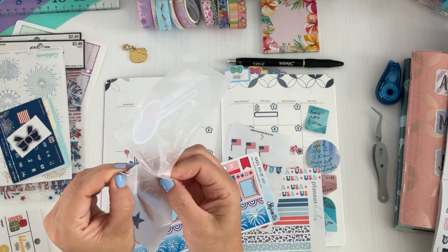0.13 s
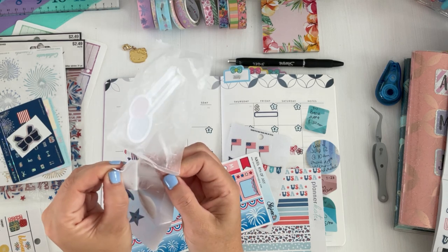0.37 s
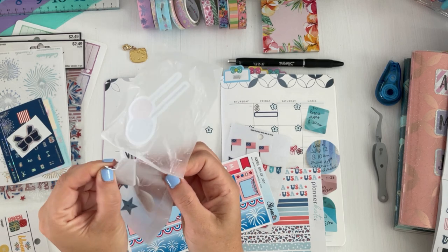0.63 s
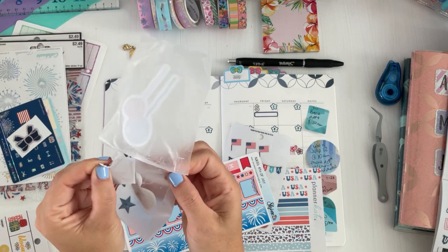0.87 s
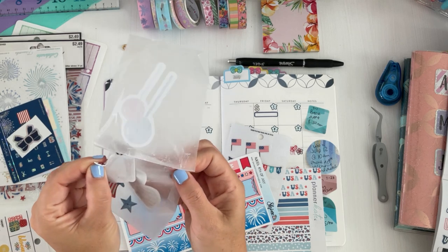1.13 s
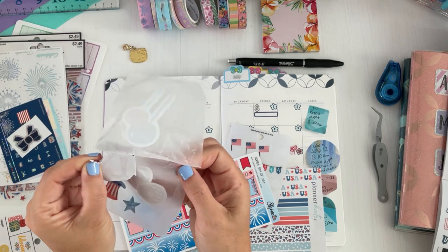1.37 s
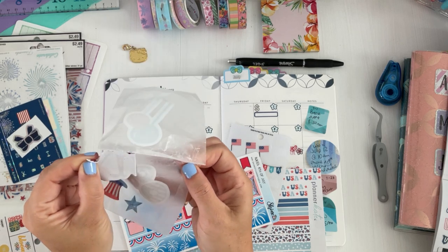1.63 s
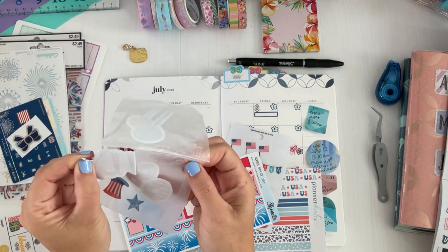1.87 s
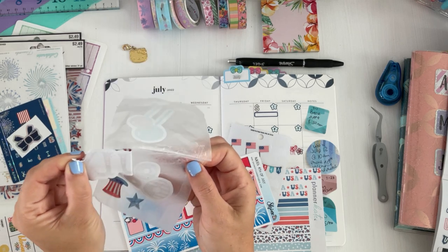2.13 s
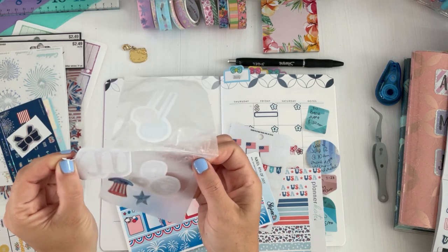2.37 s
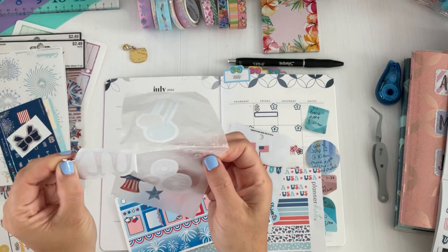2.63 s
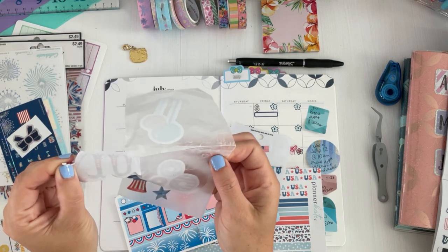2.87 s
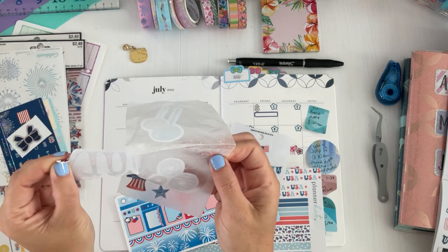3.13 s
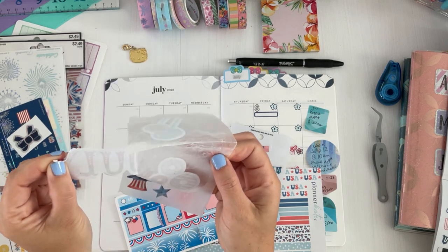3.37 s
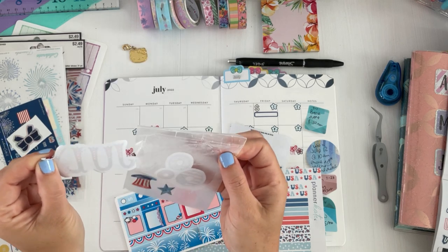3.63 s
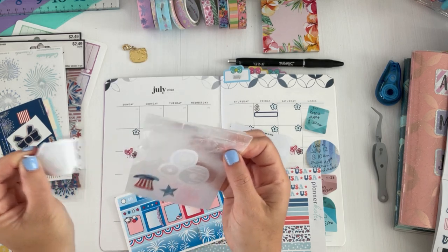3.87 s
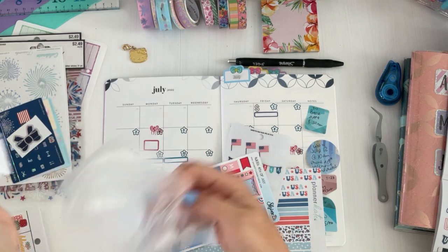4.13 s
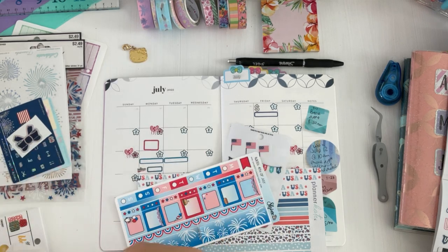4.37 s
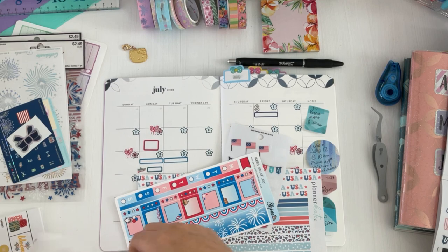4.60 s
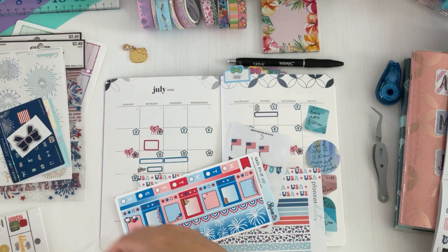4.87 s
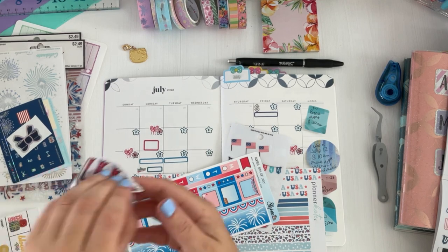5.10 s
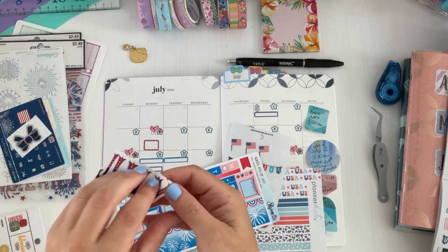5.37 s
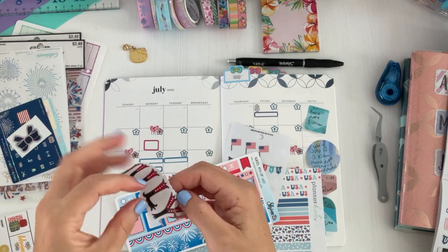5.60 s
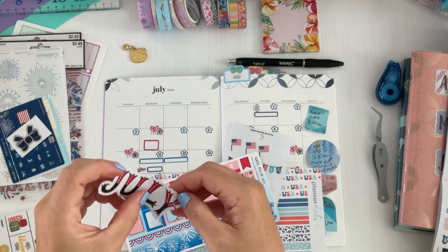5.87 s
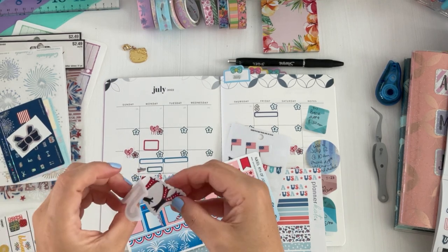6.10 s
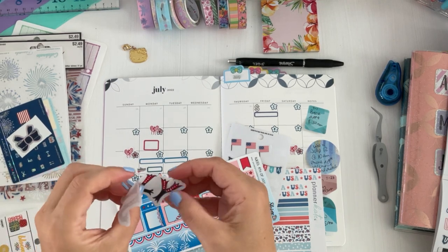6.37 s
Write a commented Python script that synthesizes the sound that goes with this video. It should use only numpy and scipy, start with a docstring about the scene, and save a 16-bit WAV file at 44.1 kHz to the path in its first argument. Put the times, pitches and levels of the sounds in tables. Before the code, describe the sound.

Close crackling and rustling of a thin plastic wrapper being peeled, busiest past the middle, in a quiet room with a faint low hum.

```python
"""Hands peel and crumple thin plastic film over a desk, close under a microphone in a quiet room.
From the start creases snap one at a time, each a ragged noise burst ringing its own facet, over a fine
rustle of film sliding in the fingers, made of ticks and hiss. A bright cluster bursts at 3.5 s, the snaps
crowd together around 4.3 s, then thin out and get mostly fainter, many of the last ones high.
Throughout, desk echoes and a wall tail answer each snap, and a faint hum wavers in the room tone."""
import sys
import numpy as np
from scipy import signal
from scipy.fft import rfft, irfft
from scipy.io import wavfile
from scipy.ndimage import uniform_filter1d

SR = 44100
rng = np.random.default_rng(int(sys.argv[2]) if len(sys.argv) > 2 else 0)


def waveform_to_disk(signal):
    """Save audio, clipped to [-1, 1], as 16-bit WAV at the path in sys.argv[1]."""
    frames = np.transpose(np.atleast_2d(signal))
    scaled = np.clip(frames, -1, 1) * 32767
    samples = np.round(scaled).astype(np.int16)
    wavfile.write(sys.argv[1], SR, samples)


def gain_from_db(level_db):
    """Convert decibel levels to linear amplitude factors (20 dB per decade)."""
    decades = np.asarray(level_db, float) / 20
    return 10 ** decades


N = 286120  # samples in the scene


def evened(x):
    """Scales each row to rms 1."""
    return x / np.sqrt(np.mean(x ** 2, axis=-1, keepdims=True) + 1e-20)


def read(points, hz):
    """Reads a spectrum table on a log-frequency axis."""
    f, value = np.transpose(points)
    return np.interp(np.log(hz + 1), np.log(f + 1), value)


def colour(x, points):
    """Gives x the spectrum of a table."""
    gain_db = read(points, np.fft.rfftfreq(len(x), 1 / SR))
    return irfft(rfft(x) * gain_from_db(gain_db), len(x))


def band(x, lo_hz, hi_hz):
    """Causal band-pass along the last axis."""
    return signal.sosfilt(signal.butter(3, [lo_hz, hi_hz], "bandpass", fs=SR, output="sos"), x)


def resonate(x, hz, width_hz):
    """One resonance with a peak gain near 1."""
    r = np.exp(-np.pi * width_hz / SR)
    return signal.lfilter([1 - r, 0, r - 1], [1, -2 * r * np.cos(2 * np.pi * hz / SR), r * r], x)


def three_bands(noises, bass_hz, body_hz):
    """Takes low flap, body and fizz from three noises, each at rms 1."""
    edges = [bass_hz, body_hz, 8000, 17000]
    return [evened(band(x, lo, hi)) for x, lo, hi in zip(noises, edges, edges[1:])]


def shifting(x, patchy_db, broad_db):
    """Narrow and broad frequency ranges swell and fade at random, alike in every row."""
    z = signal.stft(x, nperseg=512, noverlap=384)[2]
    chance = rng.standard_normal(z.shape[:0:-1]).T  # (frequency, time)
    patches = uniform_filter1d(uniform_filter1d(chance, size=6, axis=0), size=60, axis=1)
    broad = uniform_filter1d(uniform_filter1d(chance[::-1], size=28, axis=0), size=30, axis=1)
    gain_db = patchy_db * patches / patches.std() + broad_db * broad / broad.std()
    return signal.istft(z * gain_from_db(gain_db), nperseg=512, noverlap=384)[1][:, :N]


def slow(top_hz):
    """Slow chance at rms 1: sines of random phase up to a top rate."""
    t = np.arange(0, N + 256, 256) / SR
    rates = np.geomspace(1.2, top_hz, num=24)
    wave = sum(np.sin(2 * np.pi * (f * t + rng.random())) / np.sqrt(f) for f in rates)
    return evened(np.interp(np.arange(N) / SR, t, wave))


# colour of the still air in the room: (f/Hz, relative level per Hz/dB)
AIR_COLOUR = [(18, -44), (33, -35), (90, -4), (165, -0.5), (435, -8), (566, -15), (716, -18), (931, -20),
              (1010, -23.5), (1150, -24), (1490, -27), (1840, -12), (2300, -20.5), (3540, -30),
              (12200, -37.5), (15800, -33.5)]
# fuzzy low tones in the room: (f/Hz, width/Hz, rms level/dB)
LOW_TONES = [(254, 22, -75), (74, 20, -75.5), (92, 9.8, -82), (352.2, 8.8, -80.5)]


def room_tone():
    """Still air as coloured noise, low tones as resonated noise, and a hum whose pitch and level waver."""
    air = shifting(rng.standard_normal((1, N)), patchy_db=3.0, broad_db=0.16)[0]
    air = gain_from_db(-64.5) * evened(colour(air, AIR_COLOUR))
    noise = rng.standard_normal((len(LOW_TONES), N))
    fuzz = np.zeros(N)
    for n, (hz, width_hz, db) in zip(noise, LOW_TONES):
        fuzz += gain_from_db(db) * evened(resonate(resonate(n, hz, width_hz), hz, width_hz))
    hum_hz = 130.5 + 1.7 * slow(12)
    hum_db = -65.5 + 1.9 * slow(25)  # rms level
    hum = np.sqrt(2) * gain_from_db(hum_db) * np.sin(2 * np.pi * np.cumsum(hum_hz) / SR)
    return air + fuzz + hum


# how long the walls of the room ring on: (f/Hz, t60/s)
WALL_DECAY = [(400, 0.82), (1500, 0.28), (4000, 0.21), (9000, 0.068), (16000, 0.23)]


def walls(x):
    """Sparse taps of random sign, one in every 20 samples, each band dying at its own speed."""
    taps = np.zeros(SR // 2)
    at = np.arange(400, SR // 2 - 20, 20)  # the tail starts about 9 ms late
    taps[at + rng.integers(0, 20, len(at))] = rng.choice([-1., 1.], len(at))
    hz, t, z = signal.stft(taps, SR, nperseg=256)
    t60 = np.clip(read(WALL_DECAY, hz), .03, 2)[:, None]
    tail = signal.istft(z * gain_from_db(-60 * t / t60), SR, nperseg=256)[1]
    return signal.oaconvolve(x, tail / np.linalg.norm(tail))[:N]


# single echoes from the desk and near things, after the direct sound: (t/s, level/dB)
DESK_ECHOES = [(.0016, -28), (.0034, -18), (0.0142, -51), (0.018, -44), (.021, -43.5)]


def desk(x):
    """Direct sound with single delayed echoes from the desk and near things."""
    taps = np.zeros(2048)
    taps[0] = 1
    for s, db in DESK_ECHOES:
        taps[round(s * SR)] = gain_from_db(db)
    return signal.oaconvolve(x, taps)[:N]


# changing base level and brightness of the rustle: (t/s, level/dB, brightness/dB)
BASE_RUSTLE = [(0.0, -57, -2), (0.48, -57.5, 1), (0.72, -63.5, -1), (1.2, -60.5, 4.5), (1.42, -70.5, 3),
               (1.58, -61.5, 0), (1.74, -55.5, -2.5), (1.87, -68, -2), (1.99, -66.5, 1), (2.55, -60, -3.5),
               (2.9, -63.5, -1), (3.4, -66, -1.5), (3.66, -80, 4), (4.2, -61.5, -9.5), (4.6, -73, 21),
               (4.84, -62, 1), (4.92, -83, -16), (5.04, -92.5, -6), (5.3, -80.5, 0.5), (5.6, -94, -7.5),
               (5.7, -72.5, 1), (5.9, -65, 11), (6.04, -85, -12), (6.38, -76.5, -25), (6.49, -58.5, -1)]
# swells of the film's rustle, from tight bursts to long slides; rise and fall times under 1 ms act as 1 ms:
# (t of the top/s, level/dB, t to rise 20 dB/s, t to fall 20 dB/s, brightness/dB)
RUSTLE_SWELLS = [(.13, -58.5, -1.5, 0.8, 5), (.529, -56, .05, 0.08, -11.5), (1.055, -60.5, -0.2, 0.5, -5),
                 (1.265, -52.5, .03, 0.1, -6), (2.138, -51, 0.03, 0.4, 2), (2.389, -51, 0.8, .18, 0),
                 (3.25, -61, 0.3, .2, 0), (3.503, -40, .01, .02, 0), (3.51, -49, 0.0958, .16, 0),
                 (3.82, -55, .12, .07, 0), (3.835, -42, .008, 0.0243, -2), (3.975, -44, 0.02, 0.0252, -11),
                 (3.985, -60, -0.03, 0, -10), (4.063, -49.5, 0.01, 0.04, -6),
                 (4.18, -57.5, -0.02, 0.36, -5.5), (4.252, -36, 0.02, .012, -3), (4.293, -51, .1, .2, -12),
                 (4.475, -41, .007, .011, -1), (4.48, -52.5, .007, .15, -10),
                 (4.595, -50.5, 0.2, 0.2649, 2), (5.061, -49, .002, 0, 2), (5.085, -51.5, .02, .1, 1),
                 (5.236, -51, .05, .04, 2), (5.386, -61, 0.14, 0.1, 0), (5.458, -50.5, .115, 0.01, 4),
                 (5.492, -53, 0.04, -0.03, 4), (5.532, -58, .07, 0.04, 3), (5.644, -58, 0.01, 0.1, 3.5),
                 (5.727, -65.5, 0.06, .15, 9), (5.797, -58.5, .17, 0.21, 3), (5.914, -45, .022, .008, 3.5),
                 (5.929, -55, -0.02, .05, -1), (6.062, -73, .03, .05, 7), (6.172, -63.5, 0.08, 0.16, 0.5),
                 (6.237, -57, 0.04, .06, 6), (6.33, -72, .08, .12, 8.5), (6.45, -62, .09, .15, 7.5)]


def rustle_gains():
    """Gains of flap, body and fizz: the changing base and each swell add their power."""
    fizz_db, flap_db = 0, -3.5  # relative to the body
    dull_flap = 0.6  # bright rustle fizzes more and flaps less: dB of flap lost per dB of brightness
    flap_time_s, quick_loss_db = .045, 3.5  # quicker swells lose flap for each halving of their length
    t = np.arange(0, N + 64, 64) / SR
    s, db, bright_db = np.transpose(BASE_RUSTLE)
    parts = [(np.interp(t, s, db), np.interp(t, s, bright_db), 0)]
    for top, db, rise, fall, bright_db in RUSTLE_SWELLS:
        rise, fall = max(rise, .001), max(fall, .001)
        level_db = db - 20 * np.maximum((top - t) / rise, (t - top) / fall)
        lost_db = quick_loss_db * max(np.log2(flap_time_s / (rise + fall)), 0)
        parts.append((level_db, bright_db, lost_db))
    power = 0
    for db, bright_db, lost_db in parts:
        flap = db + flap_db - dull_flap * bright_db - lost_db
        power = power + gain_from_db([flap, db, db + fizz_db + bright_db]) ** 2
    return np.array([np.interp(np.arange(N) / SR, t, np.sqrt(p)) for p in power])


# colour of film heard over the desk: (f/Hz, relative level per Hz/dB)
FILM_COLOUR = [(180, -40), (300, -5.5), (360, -1.5), (676, 0), (1250, -10), (1430, -3.5), (1770, 1),
               (2090, -1), (3670, -1), (4190, 2), (5030, 6), (7130, -0.5), (8140, 0), (12100, -5),
               (15800, -8)]


def rustle(gains):
    """Tiny creases tick over a sliding hiss of shifting colour; the gains set the level of each range."""
    ticks_per_s, spread_db, smooth_hiss, grain_s = 900, 3, 2.3, 0.0025
    ticks = gain_from_db(spread_db * np.minimum(rng.exponential(1, N), 5))
    ticks *= rng.random(N) < ticks_per_s / SR
    lumps = signal.oaconvolve(ticks, np.exp(-np.arange(400) / SR / grain_s))[:N]
    hiss = (smooth_hiss + evened(lumps)) * rng.standard_normal((3, N))
    hiss = shifting(hiss, patchy_db=2.1, broad_db=1.6)
    bands = three_bands([colour(h, FILM_COLOUR) for h in hiss], 180, 3900)
    return (gains * bands).sum(0)


# low knocks, many under the snaps: (t/s, level/dB before a soft onset lowers it, f/Hz)
LOW_KNOCKS = [(0.117, -62, 1234), (0.51, -38, 940), (1.644, -42.5, 378), (2.128, -34.5, 1260),
              (2.131, -34.5, 364), (2.339, -41, 684), (3.501, -39.5, 1110), (3.503, -38, 390),
              (3.84, -43.5, 360), (3.812, -40, 1270), (3.977, -39, 471), (4.204, -41, 1315),
              (4.249, -42, 580), (4.254, -43, 280), (4.283, -34, 946), (4.298, -42, 480), (4.321, -36, 630),
              (4.334, -43, 520), (4.546, -37, 1270), (4.547, -40, 755), (5.914, -45, 642)]


def low_knocks():
    """Dull, short knocks: decaying sines with a soft onset."""
    t, out = np.arange(2048) / SR, np.zeros(N + 2048)
    for s, peak_db, hz in LOW_KNOCKS:
        knock = gain_from_db(peak_db - 60 * t / 0.023) * np.sin(2 * np.pi * hz * t)  # t60 23 ms
        out[round(s * SR):][:2048] += knock * (1 - np.exp(-t / 0.00039))
    return out[:N]


# rings of the film's facets: (f/Hz, width/Hz, level before chance shares/dB)
FILM_FACETS = [(1920, 89, -12), (2640, 270, -6), (2970, 660, 5), (4600, 460, 1), (5400, 130, 0.5),
               (6800, 670, -9), (7920, 430, -1), (9800, 400, -47)]


def facets(jolts, own_hz):
    """Every snap shakes the film's facets by chance amounts, those near its own ring most."""
    scatter_db, db_per_octave = 6, 5
    share_db = scatter_db * rng.standard_normal((len(jolts), len(FILM_FACETS)))
    share_db -= db_per_octave * abs(np.log2(np.transpose(FILM_FACETS)[0] / own_hz[:, None]))
    rings = 0
    for share, (hz, width_hz, db) in zip(share_db.T, FILM_FACETS):
        rings = rings + gain_from_db(db + share)[:, None] * resonate(jolts, hz, width_hz)
    return evened(rings)


def snaps(creases):
    """A crease flips: a ragged burst of tiny jolts that holds, dies in milliseconds and rings its own facet most."""
    hold_s, ragged_db, flip = .0016, 4, 3.2  # a crease keeps tearing for the hold before it dies away
    s, peak_db, hz, low_db, top_db, t60 = creases
    t, t60 = np.arange(2048) / SR, np.clip(t60, .003, .08)[:, None]
    jolts = rng.standard_normal((len(s), 3, 2048))
    jolts[:, :, 8] += flip  # the flip itself leads
    rise = 0.026 * t60 * (t60 / .012) ** 1.5  # slow creases swell in softly
    stutter = evened(uniform_filter1d(rng.standard_normal((len(s), 2048)), size=30, axis=1))
    dying = np.maximum(t - hold_s, 0) / t60
    shape_db = -60 * dying + ragged_db * stutter * np.minimum(t60 / 0.02, 1)
    jolts = np.swapaxes(jolts, 0, 1) * (1 - np.exp(-t / rise)) * gain_from_db(shape_db)
    low, body, fizz = three_bands(jolts, 850, 2400)
    low = evened(low + gain_from_db(3) * evened(resonate(jolts[0], 1820, 260)))  # the widest facet flaps
    fizz = evened(signal.lfilter([1], [1, -.5], fizz))  # fizz falls toward the top
    body = evened(np.array([resonate(j, f, .6 * f) for j, f in zip(body, hz)]))  # strongest around the ring
    ring = evened(np.array([resonate(j, f, f / 10) for j, f in zip(jolts[1], hz)]))
    body = evened(body + gain_from_db(5) * ring + facets(jolts[1], hz))
    burst = body + gain_from_db(low_db)[:, None] * low + gain_from_db(top_db)[:, None] * fizz
    burst *= (gain_from_db(peak_db) / abs(burst).max(1))[:, None]
    out = np.zeros(N + 2048)
    starts = np.round((s - rise[:, 0]) * SR).astype(int)
    for start, one in zip(starts, burst):
        out[start:start + 2048] += one
    return out[:N]


def small_creases(gains):
    """Small creases go at random moments, more and stronger in a loud rustle, each on a chance facet."""
    count, mean_t60_s = 900, .01
    busy_db, busy_range_db = -47, 19.5  # rustle level at which every crease goes; none go this far below it
    over_db, spread_db = 10, 2  # they stand this far above the rustle
    flap_db, fizz_db, scatter_db = -13.5, -2.5, 6.5
    at, size, facet, slowness, stiff = rng.random((count, 5)).T
    low, top = scatter_db * rng.standard_normal((count, 2)).T
    s = .02 + at * (N / SR - .04)
    _, body_db, rustle_fizz_db = 20 * np.log10(gains[:, (s * SR).astype(int)])
    peak_db = np.minimum(body_db, busy_db) + over_db - spread_db * np.log(1 - .95 * size)
    # stiff ones go only where the rustle is loud
    peak_db -= 200 * np.maximum(stiff - 1 - (body_db - busy_db) / busy_range_db, 0)
    hz = np.transpose(FILM_FACETS)[0][(facet * len(FILM_FACETS)).astype(int)]
    top_db = fizz_db + top + rustle_fizz_db - body_db
    return snaps((s, peak_db, hz, flap_db + low, top_db, mean_t60_s * (.5 + slowness)))


# the clearest creases snapping, close to the microphone:
# (t/s, peak level/dB, ring f/Hz, low flap level re ring band/dB, top fizz level re ring band/dB)
CLEAR_SNAPS = [(0.0223, -30, 1790, -0.5, -21), (0.1181, -17.5, 4540, -12, 0), (0.1356, -30, 5040, -30, -4),
               (0.2893, -39, 4830, -25.5, -17), (0.5122, -13, 4270, -12.5, -10.5),
               (0.6431, -27, 4300, -15, -6), (0.7676, -46, 1840, 14, -1), (0.8406, -32.5, 4600, -9.5, -22),
               (1.0225, -35.5, 1850, 0, -19), (1.0564, -24.5, 4240, -6, -5), (1.1038, -34.5, 2470, -9, -8),
               (1.12, -34, 4670, -9, -11), (1.163, -28.5, 4930, -30, -7.5), (1.421, -36, 4300, -14, -26),
               (1.567, -32.5, 5030, -18, 1), (1.645, -27, 7140, -5, -1.5),
               (1.7358, -36, 4780, -13.5, -16.5), (1.7552, -39, 1840, -6, -22),
               (1.7905, -29, 5250, -8.5, 3), (1.9017, -25.5, 6550, -16, -0.5),
               (1.9691, -19, 6200, -46, -28.5), (2.0093, -36, 6100, -6, -24), (2.0955, -29, 3950, -22, -6),
               (2.1082, -30, 1720, 21, -22), (2.13, -20, 7400, -4.5, -6), (2.1405, -30.5, 2350, -6, -19),
               (2.1492, -23, 4600, -35, -20), (2.2376, -15.5, 5050, -36, -8),
               (2.2616, -32, 4300, -22, -15.5), (2.3142, -28.5, 1730, -6, -16), (2.34, -30.5, 5320, -1, -6),
               (2.3439, -18, 4670, -19, -8), (2.4012, -27.5, 6800, -19, -1), (2.5398, -35, 2970, -6, -18),
               (2.584, -22.5, 4600, -2.5, -2.5), (2.6457, -29, 2220, -18, -19),
               (2.7684, -27, 4800, -20, -1.5), (2.9358, -19.5, 5300, -16.5, 1),
               (2.9999, -32.5, 1790, -5, -9), (3.1826, -29.5, 5340, -44.5, -29),
               (3.2345, -33, 1830, -22.5, -16), (3.2406, -25.5, 2360, -23, -3.5),
               (3.2504, -31, 2480, -13.5, -31), (3.268, -33.5, 3970, -14, -19.5),
               (3.2865, -42, 5640, -20, -5), (3.4022, -33, 8200, -39, 1), (3.4902, -33, 11970, -23, 5),
               (3.4992, -13, 13800, -29, -4), (3.5003, -14.5, 9600, -23, 4), (3.5014, -15, 5430, -7, -2.5),
               (3.5075, -25, 4700, -9, -9), (3.5238, -22, 9700, -25, 0), (3.5352, -33, 5000, -15, -8),
               (3.5392, -23, 9000, -16, 0), (3.5408, -20, 4900, -16.5, -6), (3.5991, -35.5, 5500, -7, -23),
               (3.748, -26.5, 5340, -4, -11), (3.7896, -17.5, 5600, -21, -9), (3.8128, -23, 5100, -10, -9),
               (3.8315, -26.5, 4500, -4, -6.5), (3.8335, -20.5, 7740, -12, 3),
               (3.8352, -22, 4400, -6.5, -1), (3.8792, -23, 4580, -21, -4.5), (3.9111, -43.5, 1870, 8, -10),
               (3.9722, -31, 4000, -8, -5), (3.9749, -26, 2580, -8, -14), (3.989, -28, 4690, -7.5, -7),
               (4.0172, -23.5, 4530, -14, -7.5), (4.0245, -29.5, 5510, -9, -19),
               (4.0505, -32.5, 2620, -24, -15), (4.0625, -36, 6040, -20, -2.5),
               (4.0865, -43, 9000, -24, -2), (4.0678, -30, 4600, -7.5, 2), (4.1273, -39, 3070, -5.5, -22),
               (4.14, -38, 5170, -23, -15), (4.17, -38, 5400, -10, -19), (4.1915, -39, 5220, -4, -9),
               (4.2045, -29, 4500, -10, -2), (4.2068, -22, 2950, -10.5, -3), (4.2273, -29, 4410, -12, -3),
               (4.2415, -27.5, 9000, -12, 2.5), (4.2465, -21, 4000, -10, -7), (4.2505, -18, 4970, -14, -4),
               (4.252, -10, 8250, -23, -8), (4.2558, -20.5, 5500, -11, -7), (4.2607, -34, 8700, -5, 14),
               (4.2689, -31, 3940, 0, -6), (4.2783, -22, 5140, -19, -5), (4.2823, -22.5, 4600, -14, -5),
               (4.2852, -14.5, 4600, -21, -7), (4.2875, -18.5, 3520, -13, -10),
               (4.2957, -28, 4200, -11, -6), (4.2978, -20, 5270, -17, -4.5), (4.3003, -23.5, 5000, -12, -9),
               (4.3049, -20, 5060, -23, -13), (4.3105, -23, 4250, -12, -2.5), (4.312, -23, 4400, -16, -3),
               (4.3221, -11, 8250, -20, -10), (4.3323, -21, 5460, -4, -4), (4.3356, -23, 4800, -11, -3),
               (4.3515, -25, 4970, -24, -24.5), (4.3587, -24, 5400, -19, -5), (4.3674, -29, 4750, -2, 4),
               (4.381, -34, 5400, -10, -12), (4.402, -33, 2800, -12, -8.5), (4.4062, -32, 2900, -4, -6.5),
               (4.4209, -35, 1430, -4, -16), (4.4518, -45, 4870, -6, -3), (4.4672, -33.5, 5500, -5, -10),
               (4.4722, -31, 5400, -3, -4), (4.476, -22, 5900, -32, -8), (4.506, -34, 5770, -9, -6),
               (4.5458, -33.5, 1420, 5, 0), (4.5285, -38, 5100, -25, -20), (4.5632, -29, 6000, -10, -1),
               (4.5657, -27, 5120, -7, -2.5), (4.578, -36.5, 5500, -6, -3), (4.6023, -28, 4410, -5.5, -10),
               (4.6615, -39, 4370, -6, -3), (4.699, -37, 4940, -7, -10), (4.8034, -37.5, 3010, -6, -3),
               (4.8477, -30, 5970, -38, -28), (4.8693, -38, 3160, -17.5, -19), (4.932, -38, 5460, -1, -3),
               (5.0625, -40, 9500, -20, 12), (5.089, -40, 8870, -11, 4), (5.2318, -31.5, 4740, -10, -6),
               (5.2878, -49.5, 2480, -5, -12), (5.3765, -41, 5950, -10, -3), (5.4281, -26, 4360, -35, -12),
               (5.4555, -38, 5000, -15, 2), (5.4783, -30.5, 4760, -9, -3), (5.494, -37, 9400, -2, 9),
               (5.5235, -48, 9630, -15, 4), (5.7415, -41, 1830, -16.5, 3), (5.9144, -23.5, 1730, -24, -1.5),
               (5.9271, -25, 6400, -10, 0), (6.1094, -44, 8600, -30, -14), (6.1793, -38, 3300, -3, -14),
               (6.1876, -43, 10300, -20, 0), (6.217, -45, 9500, -20, -1), (6.226, -45, 10100, -20, 1),
               (6.234, -43, 9800, -18, -2), (6.2759, -47, 8450, -20, -5), (6.307, -52, 9790, -20, 3),
               (6.3265, -51, 12300, -15, 0), (6.395, -47, 4010, -17, -0.5), (6.414, -47.5, 12100, -20, 3),
               (6.4375, -43, 11500, -20, 5), (6.4763, -31.5, 2210, -5.5, -4.5)]


def clear_creases():
    """The clearest creases flip at their listed moments, each dying by 60 dB in 6.5 ms after its hold."""
    return snaps((*np.transpose(CLEAR_SNAPS), np.full(len(CLEAR_SNAPS), .0065)))


def scene():
    """Film in the hands, its echoes and the room tone."""
    gains = rustle_gains()
    cracks = clear_creases() + small_creases(gains) + low_knocks()
    echoed = desk(cracks) + gain_from_db(-16.5) * walls(cracks)
    return (echoed + rustle(gains) + room_tone())[None]


def band_limit(x):
    """A steep low-pass at the top of the band."""
    return signal.sosfilt(signal.butter(12, 16810, fs=SR, output="sos"), x)


def record(dry):
    """The mix is low-passed at 15830 Hz by a linear-phase filter, then finished."""
    limit = signal.firwin(301, 15830, window=("kaiser", 6), fs=SR)
    mix = signal.oaconvolve(dry, limit[None], "same")
    return band_limit(mix)


dry = scene()
out = record(dry)
waveform_to_disk(out)
```